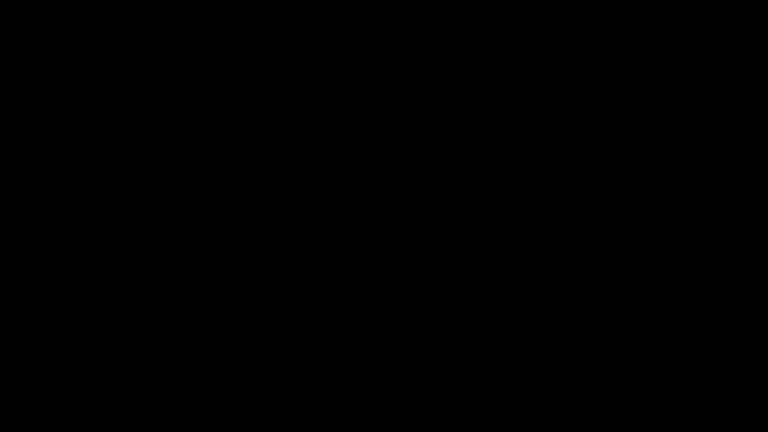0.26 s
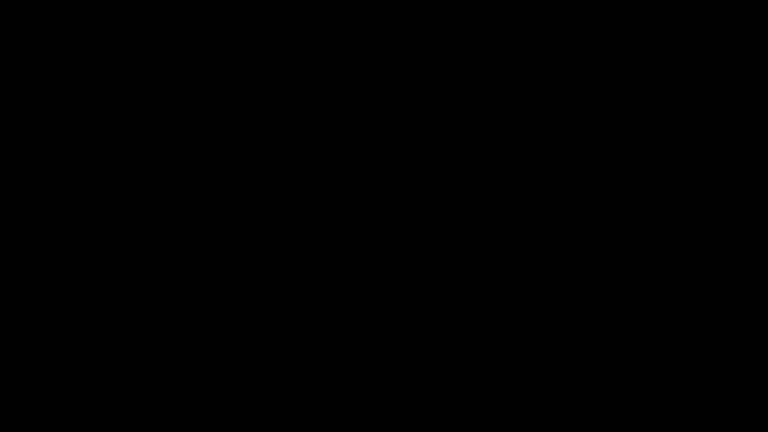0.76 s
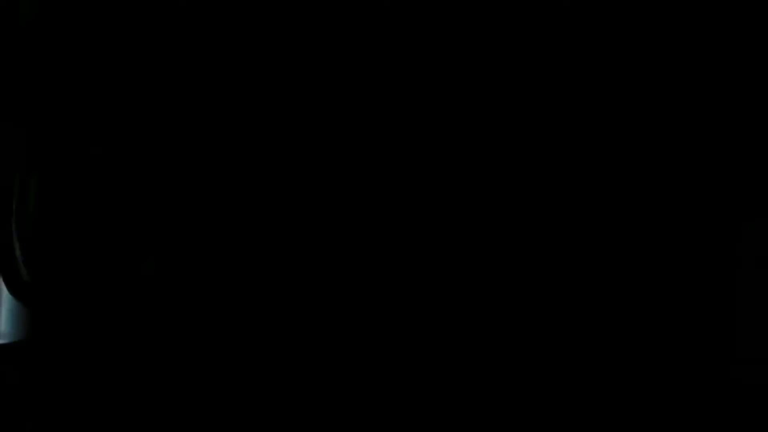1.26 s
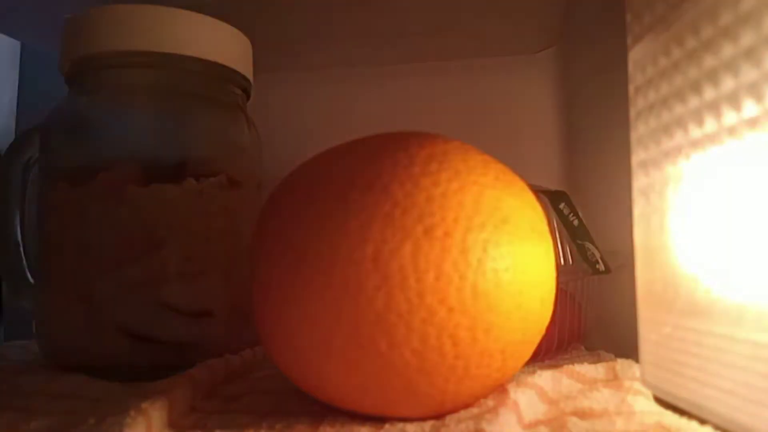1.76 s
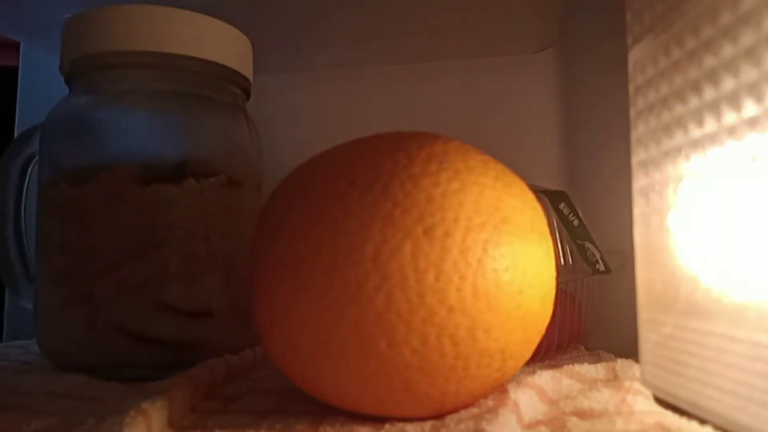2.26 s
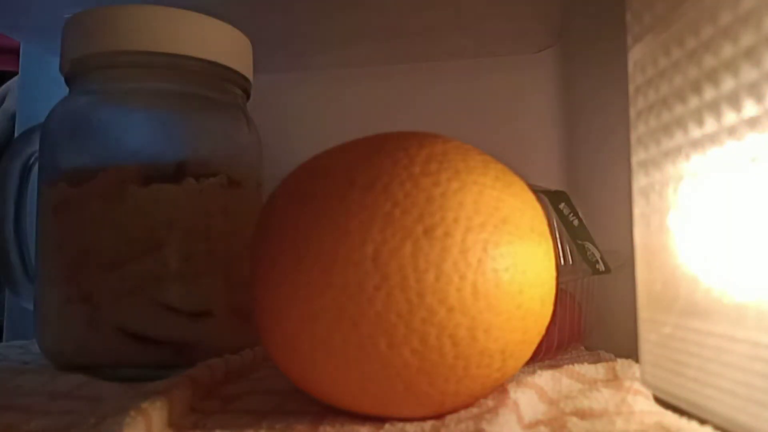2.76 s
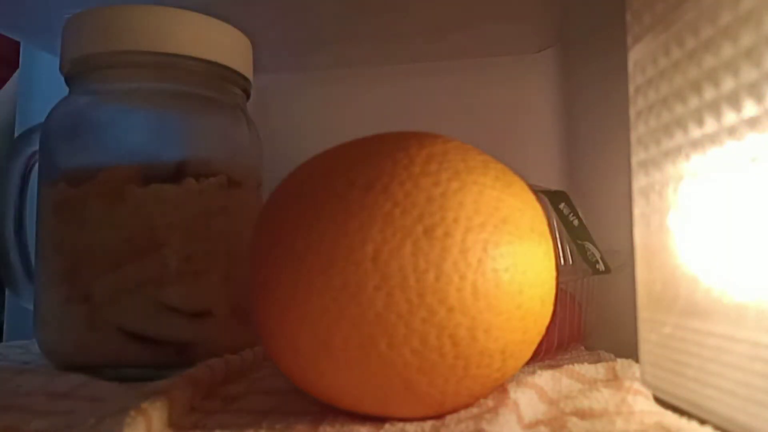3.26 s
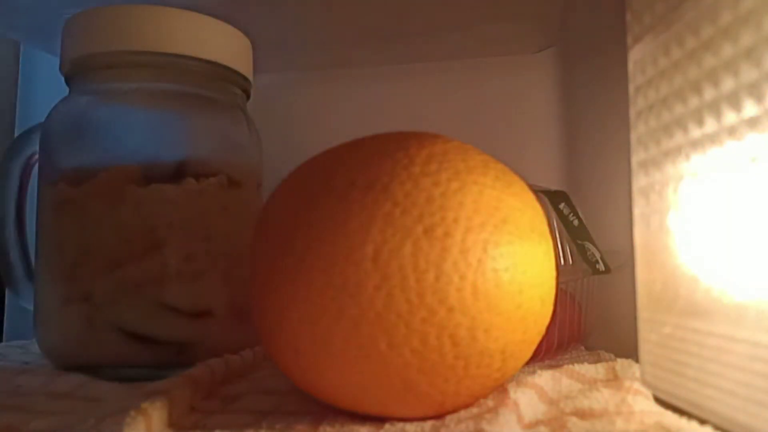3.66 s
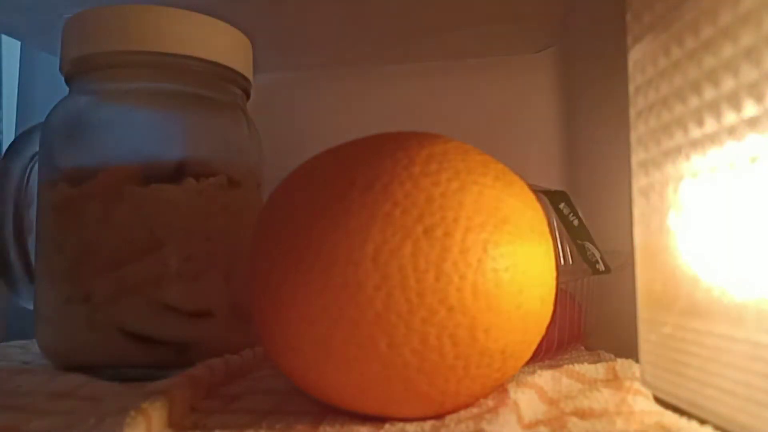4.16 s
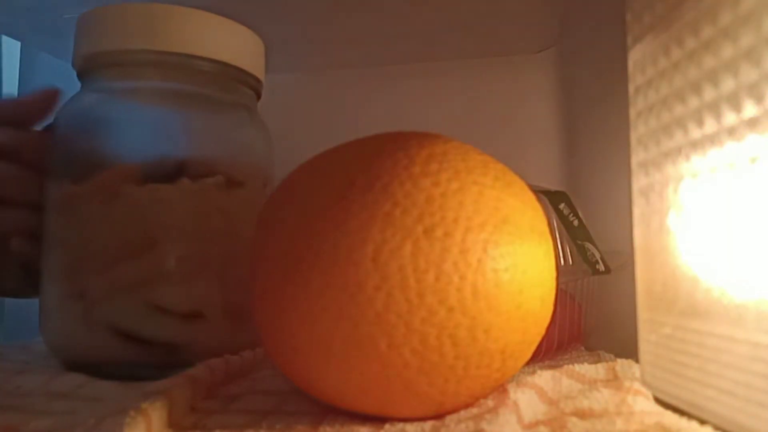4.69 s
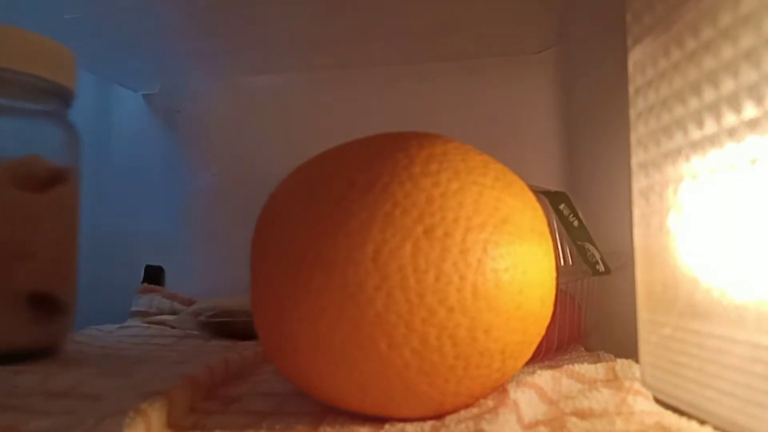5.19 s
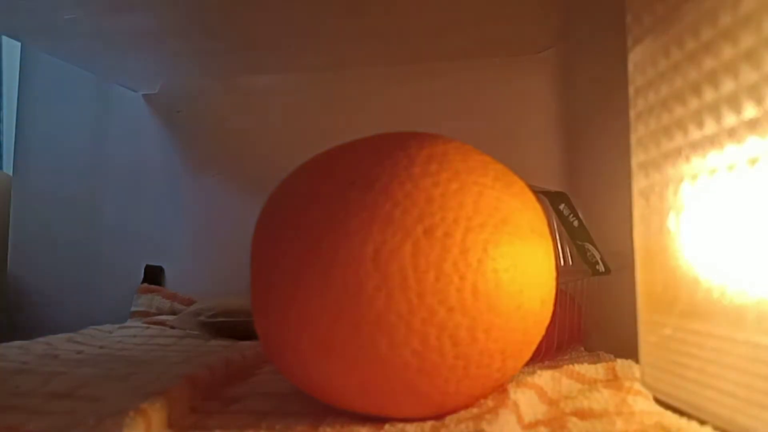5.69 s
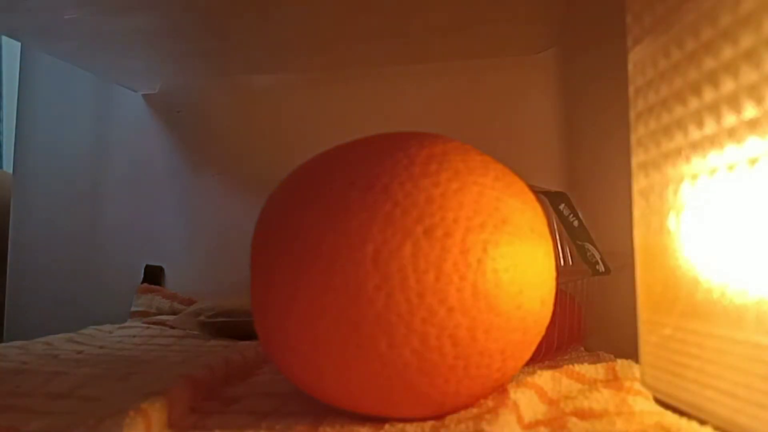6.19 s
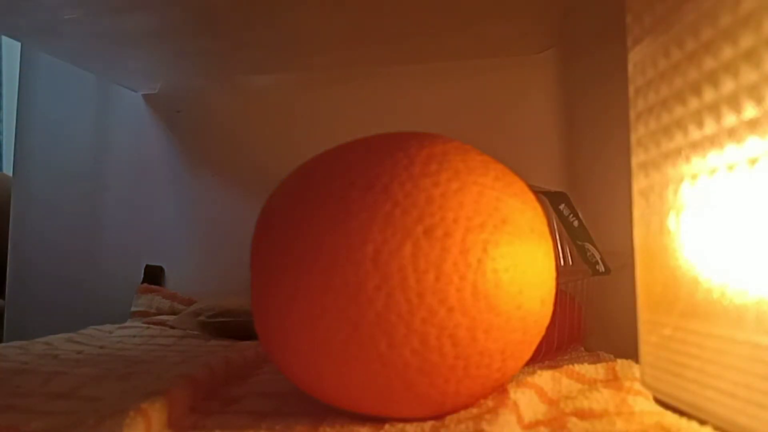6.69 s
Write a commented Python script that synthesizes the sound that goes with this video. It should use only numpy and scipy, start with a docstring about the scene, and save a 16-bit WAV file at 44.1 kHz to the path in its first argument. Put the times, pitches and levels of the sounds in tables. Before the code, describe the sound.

From inside a shut refrigerator: muffled knocks, a door seal snapping open with a low boom, then kitchen hum, rustling clothes and a jar dragged away.

```python
"""Inside a refrigerator, heard by a microphone on a shelf: hands knock at the shut door, the seal snaps free and
the cabinet air booms upward in pitch; kitchen hum, a fan and room noise come in, clothes rustle and a glass jar
is dragged off. Knocks and rubs drive ringing liner modes with noise bursts or slips; bumps, a low push of air and
clinks are dying tones. The boom and a thin squeak are gliding tones, mains and fan wavering sines, and clothes,
cabinet air and room are shaped noise."""
import sys
import numpy as np
from scipy import signal
from scipy.fft import rfft, irfft
from scipy.io import wavfile
from scipy.ndimage import uniform_filter1d

SR = 44100
rng = np.random.default_rng(int(sys.argv[2]) if len(sys.argv) > 2 else 0)


def how_loud(loudness_db):
    """Turn decibels into a plain amplitude multiplier (0 dB gives 1, 20 dB gives 10)."""
    steps = np.asarray(loudness_db, float) / 20
    return 10 ** steps


def wav_record(signal):
    """Record a signal, one row per channel, as 16-bit PCM in the file named by sys.argv[1]."""
    frames = np.transpose(np.atleast_2d(signal))
    bounded = np.clip(frames, -1, 1)
    # unit amplitude maps onto the largest positive 16-bit level
    quanta = np.round(bounded * 32767).astype(np.int16)
    wavfile.write(sys.argv[1], SR, quanta)


N = 305921
T = np.arange(N) / SR


def evened(x):
    """Scales to unit rms."""
    return x / np.sqrt(np.mean(x ** 2) + 1e-20)


def curve(rows, order=1):
    """Draws one column of a table as a line over time."""
    rows = np.transpose(rows)
    return np.interp(T, rows[0], rows[order])


def add(mix, s, sound):
    """Mixes a sound in at time s."""
    part = mix[round(s * SR):][:len(sound)]
    part += sound[:len(part)]


def coloured(x, points):
    """Shapes x by a spectrum of (frequency [Hz], gain [dB]), joined along log frequency."""
    f, db = np.transpose(points)
    hz = np.fft.rfftfreq(len(x), 1 / SR)
    gain = how_loud(np.interp(np.log(hz + 1), np.log(f + 1), db))
    return irfft(rfft(x) * gain, len(x))


def slow(hz):
    """Random drift below hz, of unit rms."""
    return evened(signal.lfilter(*signal.butter(2, hz, fs=SR), rng.standard_normal(N)))


def resonate(x, hz, width):
    """A resonance of gain 1, by shifting to zero, smoothing and shifting back."""
    turn = np.exp(2j * np.pi * hz * T)
    r = np.exp(-np.pi * width / SR)
    return 2 * (turn * signal.lfilter([1 - r], [1, -r], x / turn)).real


def ring(hz, t60, rise=0.004):
    """A dying tone with a soft onset; t60 and rise in seconds."""
    t = np.arange(round(.25 * SR)) / SR
    return (1 - np.exp(-t / rise)) * how_loud(-60 * t / t60) * np.sin(2 * np.pi * hz * t)


def glide(hz, db, waver_db):
    """A wavering tone that follows a pitch given per sample, with tapered ends."""
    tone = np.sqrt(2) * np.sin(2 * np.pi * np.cumsum(hz) / SR)
    level = how_loud(db + waver_db * slow(hz=41.7)[:len(hz)])
    return tone * level * signal.windows.tukey(len(hz), .1)


def fade_in(start_s, length_s):
    """A straight ramp from 0 to 1."""
    return np.clip((T - start_s) / length_s, 0, 1)


LEAK, SEAL_S, SWING_S = 0.11, 0.99, 0.28  # opening 0-1 with the door shut; start and length of the swing [s]
CLOSING_PER_S = 0.02  # slow drift back


def door():
    """How far the door stands open, 0-1: a straight swing, then a slow drift back."""
    opened = LEAK + (1 - LEAK) * fade_in(SEAL_S, SWING_S)
    return np.clip(opened - CLOSING_PER_S * np.maximum(T - SEAL_S - SWING_S, 0), 0, 1)


BOOM_S, BOOM_END_S, BOOM_ATTACK_S = 1.296, 1.57, 0.012
BOOM_DB, BOOM_RISE_DB_PER_S, BOOM_FADE_DB_PER_S = -12.5, 700, 73
BOOM_SHUT_HZ, BOOM_OPEN_HZ, BOOM_TURN_S, BOOM_GLIDE_S = 68, 119.6, 1.355, 0.0206  # S-shaped climb


def boom():
    """The cabinet air swells as the seal lets go, then fades while its pitch climbs."""
    t = np.arange(BOOM_S, BOOM_END_S, 1 / SR)
    climb = 1 / (1 + np.exp((BOOM_TURN_S - t) / BOOM_GLIDE_S))
    hz = BOOM_SHUT_HZ + (BOOM_OPEN_HZ - BOOM_SHUT_HZ) * climb
    age = t - BOOM_S - BOOM_ATTACK_S
    swell = np.where(age < 0, BOOM_RISE_DB_PER_S * age, -BOOM_FADE_DB_PER_S * age)
    return glide(hz, BOOM_DB + swell, waver_db=1.8)


# treble as the microphone hears it, a dip near 6 kHz and peaks near 8 and 14 kHz:
# (frequency [Hz], relative level [dB per Hz])
MICROPHONE_TREBLE = [(2500, 8.5), (4300, 6.5), (5600, -10), (6800, -3.5), (8200, 3.5), (10000, -5.5),
                     (14500, -1.5), (15650, -2.5), (15900, -54)]


def treble(x):
    """Keeps the upper spectrum of x as the microphone hears it."""
    return coloured(x, MICROPHONE_TREBLE)


def level_to_loudest(x, size):
    """Scales the loudest stretch of size samples to unit rms."""
    return x / np.sqrt(uniform_filter1d(x ** 2, size).max())


# plastic liner and door-part modes: (nominal frequency [Hz], relative level [dB], undamped t60 [s])
LINER_MODES = [(389, 1.5, 0.044), (686, 2.5, 0.019), (823, -1, 0.036), (982, -8.5, 0.042),
               (1450, 7.5, 0.041), (1900, 8, 0.022), (2293, 18.5, 0.0083), (2570, 16.5, 0.011),
               (3000, 11.5, 0.016), (3450, 21.5, 0.007), (3960, 1, 0.014), (4580, -54, .03),
               (532, -7, 0.05), (1217, -12.5, 0.042), (3850, 12, 0.009)]


def liner(drive, db, bright_hz, body_db, heft_db, focus_db, treble_db, damping, size):
    """The drive rings the liner modes; the spot touched favours some and detunes all a little."""
    upper, body = np.zeros((2, len(drive)))
    for hz, mode_db, t60 in LINER_MODES:
        tone = ring(hz * (1 + .03 * rng.standard_normal()), t60 / damping, rise=.0004)
        mode = signal.oaconvolve(drive, tone)[:len(drive)] * how_loud(mode_db)
        if hz > 1300:
            upper += mode * how_loud(-focus_db * np.log2(hz / bright_hz) ** 2)
        else:
            body += mode * how_loud(heft_db * np.log2(1070 / hz))  # heavier touches reach the low modes
    crack = treble(signal.lfilter([1], [1, -.6], drive))  # blunted drive
    sound = level_to_loudest(upper, size)
    sound += how_loud(body_db) * level_to_loudest(body, size)
    sound += how_loud(treble_db) * level_to_loudest(crack, size)
    return how_loud(db) * sound


def knock(db, bright_hz, body_db):
    """A rattle of a few milliseconds with a weaker shudder after it rings the liner."""
    t = np.arange(round(.12 * SR)) / SR
    decay = how_loud(-60 * t / 0.032) + how_loud(-19.0 - 60 * t / 0.078)
    rattle = rng.standard_normal(len(t)) * decay
    padded = np.r_[np.zeros(200), rattle]  # room for the levelling window before the onset
    return liner(padded, db, bright_hz, body_db, heft_db=2.5, treble_db=-9.5, focus_db=13.0,
                 damping=1.0, size=200)[200:]


# knocks and snaps: (time [s], level of upper modes [dB], brightest frequency [Hz],
# hollow body against upper modes [dB])
KNOCKS = [(0.109, -48, 1490, 12), (0.1231, -52, 1510, 18.5), (0.2791, -51, 2410, 13.5),
          (0.3163, -52.5, 2360, 15.5), (0.403, -46, 2040, 10), (0.4377, -54.5, 1820, 17.5),
          (0.519, -42, 2820, 2.5), (0.5414, -49, 3300, 9), (0.5576, -42, 3320, 14.5),
          (0.5713, -21, 2750, 3), (0.9741, -26.5, 1860, -4), (1.0548, -47, 2540, 8),
          (1.069, -42.5, 2540, 8.5), (1.1435, -31.5, 1900, -3.5), (1.1807, -31, 2800, 1),
          (1.2131, -24.5, 2940, 5), (1.2536, -27, 2310, 5), (1.271, -18.5, 2630, 0),
          (1.293, -20.5, 2920, 0), (1.4313, -32, 1770, 2.5), (1.457, -24.5, 2120, 10),
          (1.491, -26, 2240, 4), (3.464, -55, 1800, 16), (3.684, -50, 1500, 11), (3.756, -44.5, 2500, -9),
          (4.0747, -40.5, 2460, 4), (4.1364, -42, 1570, 5.5), (4.239, -47, 4190, -17),
          (4.5437, -43, 1800, 6.5), (4.9408, -36, 2460, -4), (5.012, -40.5, 1740, 11.5),
          (5.178, -46, 1500, 13), (5.336, -48, 2500, 7), (6.558, -39, 2370, 10.5), (6.8146, -43, 2130, -10)]


def knocks(mix):
    """Knocks and snaps, each a short rattle of the liner."""
    for s, db, bright_hz, body_db in KNOCKS:
        add(mix, s, knock(db, bright_hz, body_db))


FOCUS_DB, WANDER_S = 41, 0.19  # focus of a very short rub [dB per octave squared]; its loss with length


def rub(length, db, bright_hz, body_db, heft_db):
    """A dense, lurching run of uneven slips; the touch damps the modes."""
    stroke = signal.windows.tukey(round(length * SR), .65)
    stroke *= how_loud(2.0 * slow(hz=35)[:len(stroke)])
    slips = how_loud(2.6 * rng.exponential(1, len(stroke)))
    slips *= rng.random(len(stroke)) < 4500 / SR  # about 4500 slips per second
    slips *= rng.choice([-1, 1], len(stroke)) * stroke
    focus_db = FOCUS_DB * np.exp(-length / WANDER_S)  # a short rub stays on one spot, a long one wanders
    return liner(np.r_[slips, np.zeros(3000)], db, bright_hz, body_db, heft_db, focus_db=focus_db,
                 treble_db=-8.5, damping=2.1, size=len(stroke) // 2)


# seal peeling, door creaking, hand and jar dragging: (time [s], length [s], level of upper modes [dB],
# brightest frequency [Hz], hollow body against upper modes [dB], heft [dB per octave down])
RUBS = [(0.589, 0.032, -54.5, 2200, 18, 3), (0.887, 0.05, -51, 2400, 9.5, 0),
        (1.222, 0.035, -42.5, 2500, 11, 12), (1.29, 0.096, -44.5, 2320, 12.5, 12),
        (1.374, 0.099, -41.5, 2160, 6.5, -9), (3.261, 0.2, -62, 3300, 12, 7),
        (3.97, 0.22, -54, 2200, 16, -7), (4.798, 0.31, -50, 3000, 5.5, 0), (5.052, 0.13, -51.5, 3600, 9, 6),
        (5.151, 0.25, -48.5, 3380, 7.5, 6)]


def rubs(mix):
    """Peeling, creaking and dragging, each a run of slips that rings the liner modes."""
    for s, length, db, bright_hz, body_db, heft_db in RUBS:
        add(mix, s, rub(length, db, bright_hz, body_db, heft_db))


BUMP_T60_S = 0.082
BUMP_OVERTONE, BUMP_OVERTONE_DB = 2.1, -9.5  # second mode: multiple of the pitch, relative level
# dull bumps, and the low push of air as the door comes open (68 Hz): (time [s], level [dB], frequency [Hz])
BUMPS = [(0.062, -29, 140), (0.112, -25, 150), (0.603, -10, 150), (1.061, -21.5, 170), (1.216, -22, 166.6),
         (1.258, -11, 150), (1.265, -4.5, 68), (1.662, -10.5, 91), (4.981, -15, 131), (5.013, -17, 286),
         (5.111, -18.5, 138), (5.178, -15, 140), (5.269, -20, 271), (5.29, -17.5, 123), (6.561, -23, 241)]


def bumps(mix):
    """Dull bumps and the opening door's low push of air, each two quickly dying tones."""
    for s, db, hz in BUMPS:
        thud = ring(hz, BUMP_T60_S)
        thud += how_loud(BUMP_OVERTONE_DB) * ring(hz * BUMP_OVERTONE, BUMP_T60_S)
        add(mix, s, how_loud(db) * thud)


JAR_CYCLES = 100  # cycles until a clink has died by 60 dB
# glass clinks: (time [s], level [dB], frequency [Hz])
CLINKS = [(2.372, -29.5, 3900), (2.404, -28, 3850), (5.015, -26, 3810), (5.18, -29, 1450),
          (5.259, -30, 2740)]


def jar(mix):
    """The glass clinks in single tones that die sooner the higher they are."""
    for s, db, hz in CLINKS:
        add(mix, s, how_loud(db) * ring(hz, JAR_CYCLES / hz))


STILL_DB, SWISH_ENDS_DB = -69.5, -5.5  # faint rustle between swishes; both ends of one against its middle
TICKS_PER_S, TICKS_DB = 60, -4  # small ticks on the swishes: rate, least height against the grain
# swishes of clothes: (middle [s], length [s], level at the middle [dB])
SWISHES = [(1.533, 0.2, -57.5), (1.756, 0.046, -52), (2.214, 0.16, -57.5), (2.444, 0.14, -54.5),
           (2.708, 0.061, -57.5), (3.053, .06, -63), (3.22, 0.041, -53), (3.37, 0.26, -48.5),
           (3.736, 0.19, -53), (3.896, 0.077, -51), (4.054, 0.094, -46.5), (4.244, 0.57, -55),
           (4.55, 0.055, -63), (4.96, 0.34, -58.5), (5.098, 0.043, -54), (5.277, 0.42, -53.5),
           (5.533, 0.14, -61.5), (6.51, .18, -62)]
# sharp treble ticks, several of them the bright crack of a knock: (time [s], starting level [dB])
CRACKLES = [(1.1822, -40.5), (1.214, -38), (1.245, -42.5), (1.2939, -35), (1.417, -39.5), (1.457, -43),
            (1.4905, -33), (1.7467, -50), (2.852, -49), (3.2885, -46), (4.1614, -45), (4.238, -37),
            (4.3674, -57), (4.544, -44.5), (4.7686, -48), (4.9412, -44), (5.523, -44), (6.5614, -49),
            (6.5826, -60)]


def rustle():
    """Grainy hiss of clothes in swishes with small ticks, and sharp treble ticks as dying noise bursts."""
    grain = how_loud(0.6 * slow(hz=150) + 1.55 * slow(hz=30))
    heights = how_loud(TICKS_DB + 3.55 * np.minimum(rng.exponential(1, N), 2))
    ticks = (rng.random(N) < TICKS_PER_S / SR) * heights
    grain += signal.oaconvolve(ticks, how_loud(-60 * T[:800] / 0.016))[:N]
    hiss = evened(treble(rng.standard_normal(N) * grain))
    power = how_loud(2 * STILL_DB)
    for s, length, db in SWISHES:
        power = power + how_loud(2 * (db + SWISH_ENDS_DB * (2 * (T - s) / length) ** 2))
    out = np.sqrt(power) * hiss * fade_in(1.3, 0.15)  # let in by the opening door
    for s, db in CRACKLES:
        burst = evened(treble(rng.standard_normal(800)))
        add(out, s, how_loud(db) * burst * how_loud(-60 * T[:800] / 0.053))
    return out


SQUEAK_S, SQUEAK_LENGTH_S, SQUEAK_DB = 6.36, .2, -74
SQUEAK_HZ, SQUEAK_RISE_HZ = 13400, 500


def squeak():
    """A thin broken whistle, perhaps the hinge, that jumps up in pitch at its start."""
    t = T[:round(SQUEAK_LENGTH_S * SR)]
    hz = SQUEAK_HZ + SQUEAK_RISE_HZ * (1 - np.exp(-t / .03))
    hz += 110 * slow(hz=25)[:len(t)]
    return glide(hz, SQUEAK_DB, waver_db=6.5)


MAINS_HZ, FAN_HZ = 50.1, 103.5
# mains hum: (multiple of the mains frequency, level with the door wide open [dB])
MAINS = [(2, -38), (3, -54), (6, -65.5), (8, -56), (9, -52.5)]
# fan with a strong octave, swelling while the door reflects it inward:
# (time [s], octave level [dB], fundamental level with the door wide open [dB])
FAN = [(.7, -51, -37), (1.5, -42, -31.5), (2.35, -36.5, -33), (2.8, -47, -31.5), (4.05, -49.5, -49.5),
       (6.94, -52, -32.5)]


def hum():
    """Mains multiples beating with the fan just above them; the fan's octave is heard first."""
    gap = door() * fade_in(1.25, 0.056)  # mains and fan fundamental come in at 1.25 s
    mains = np.zeros(N)
    for multiple, db in MAINS:
        level = how_loud(db + 2.2 * slow(hz=1.48) + 2.6 * slow(hz=5.2))
        mains += level * np.sin(2 * np.pi * (multiple * MAINS_HZ * T + rng.random()))
    turns = np.cumsum(FAN_HZ * (1 + 0.004 * slow(hz=6.5))) / SR + rng.random()
    fundamental = how_loud(curve(FAN, order=2) + 2.0 * slow(hz=4.4)) * np.sin(2 * np.pi * turns)
    octave = how_loud(curve(FAN) + 3.23 * slow(hz=9.8)) * np.sin(2 * np.pi * 2 * turns)
    octave *= T > FAN[0][0]  # heard from 0.7 s, before the door moves
    return np.sqrt(2) * (gap * (mains + fundamental) + octave)


# low air of the open cabinet, stirred by the door's swing and the arm reaching in: (time [s], level [dB])
CABINET_LEVEL = [(1.55, -33), (2.8, -34), (3.5, -42.5), (4.55, -34), (5.2, -39.5), (5.95, -51),
                 (6.4, -42.5), (6.9, -44)]
# its resonances: (frequency [Hz], width of each of two passes [Hz], relative level [dB])
CABINET_AIR = [(69, 29, -2), (106.6, 9, 1.5)]


def cabinet():
    """Noise in the low air resonances of the open cabinet."""
    noise = rng.standard_normal(N)
    air = np.zeros(N)
    for hz, width, db in CABINET_AIR:
        mode = resonate(resonate(noise, hz, width), hz, width)
        air += how_loud(db) * evened(mode)
    return how_loud(curve(CABINET_LEVEL)) * evened(air) * fade_in(1.3, 0.13)  # takes over as the boom dies


SHUT_DB, OPEN_DB = -41.5, -38.5  # rms levels before the door weights them
# room noise heard inside, door shut and door open: (frequency [Hz], relative level [dB per Hz])
SHUT_SPECTRUM = [(25, -20), (50, -7), (75, -19.5), (160, -7), (230, -21), (445, -14.5), (620, -25.5),
                 (1000, -32), (1300, -37.5), (2700, -39), (4100, -47.5), (5200, -68), (6000, -69),
                 (15500, -76.5)]
OPEN_SPECTRUM = [(25, -40), (50, -14.5), (79, -5.5), (156, -8.5), (289, -13), (445, -14), (520, -17),
                 (900, -17), (1200, -27), (2630, -31.5), (4000, -36.5), (5900, -60), (8200, -53.5),
                 (10500, -63.5), (14500, -56.5), (15900, -91)]


def room():
    """Muffled noise with the door shut, the kitchen's fuller noise as it opens."""
    shut = evened(coloured(rng.standard_normal(N), SHUT_SPECTRUM))
    wide = evened(coloured(rng.standard_normal(N), OPEN_SPECTRUM))
    opening = door()
    noise = how_loud(SHUT_DB) * shut * np.sqrt(1 - opening) + how_loud(OPEN_DB) * wide * opening
    return noise * how_loud(0.45 * slow(hz=11.5))


def scene():
    """Everything as heard on the shelf."""
    mix = rustle() + hum() + cabinet() + room()
    add(mix, BOOM_S, boom())
    knocks(mix)
    rubs(mix)
    bumps(mix)
    jar(mix)
    add(mix, SQUEAK_S, squeak())
    return mix[None]


def top_cut(x):
    """Nothing passes above the cut-off."""
    return signal.sosfilt(signal.butter(12, 16300, fs=SR, output="sos"), x)


def record(dry):
    """Cuts the deep bass and keeps a short silence at the start."""
    high_pass = signal.butter(4, 38, "high", fs=SR, output="sos")
    cut = signal.sosfilt(high_pass, dry)
    finished = cut * (T > 0.031)  # silent up to 31 ms
    return top_cut(finished)


dry = scene()
out = record(dry)
wav_record(out)
```